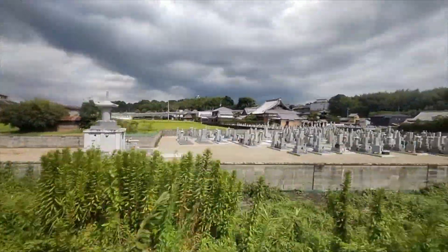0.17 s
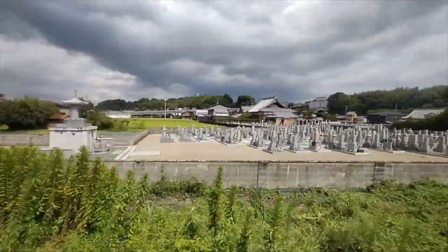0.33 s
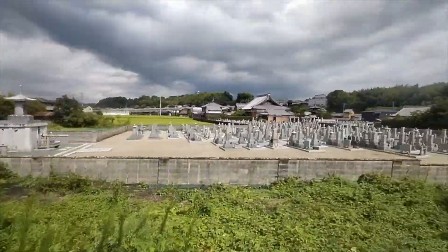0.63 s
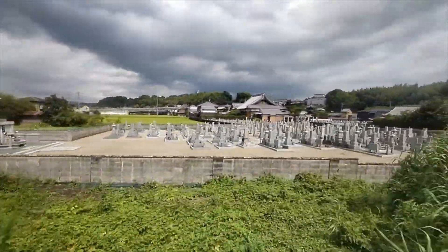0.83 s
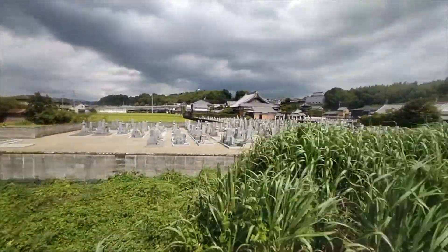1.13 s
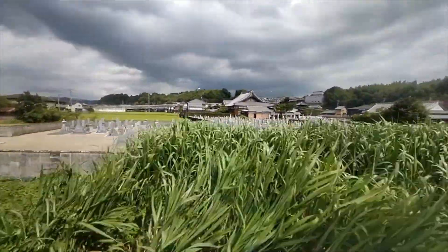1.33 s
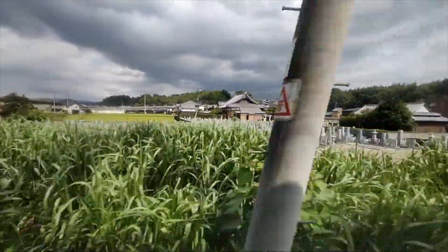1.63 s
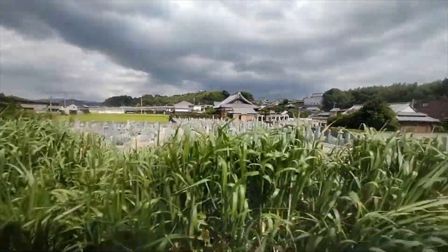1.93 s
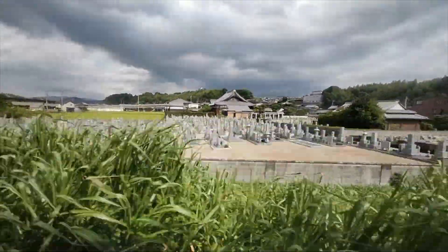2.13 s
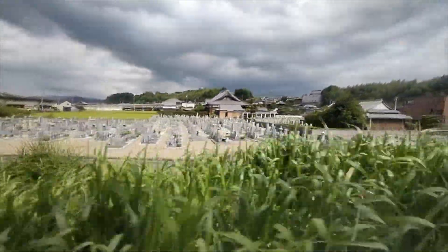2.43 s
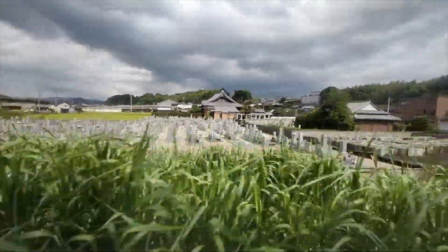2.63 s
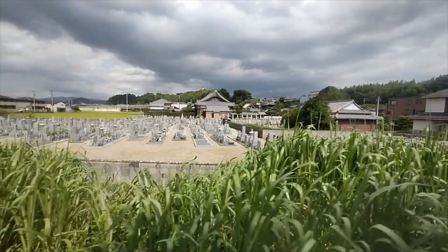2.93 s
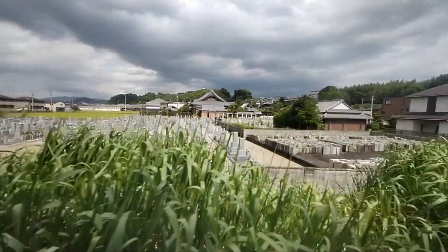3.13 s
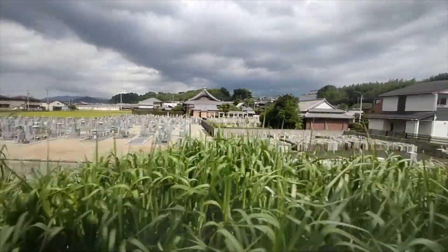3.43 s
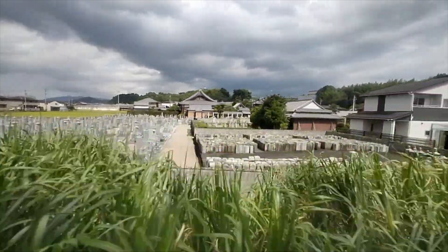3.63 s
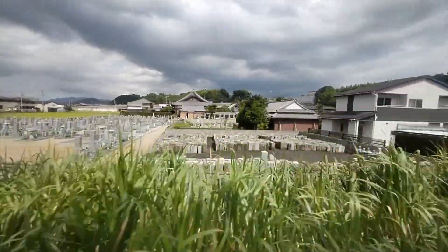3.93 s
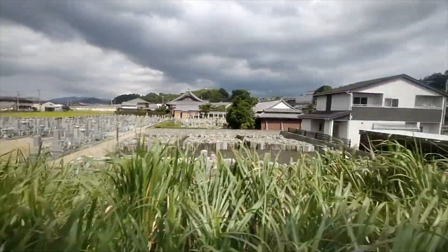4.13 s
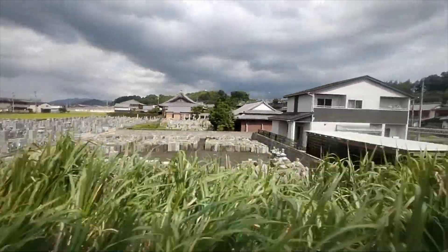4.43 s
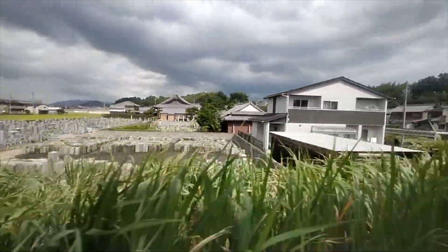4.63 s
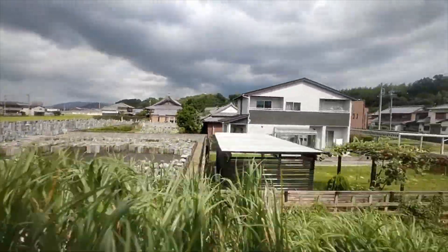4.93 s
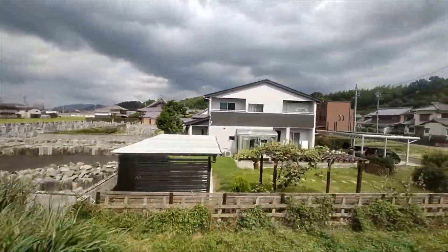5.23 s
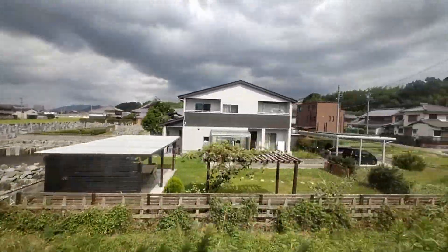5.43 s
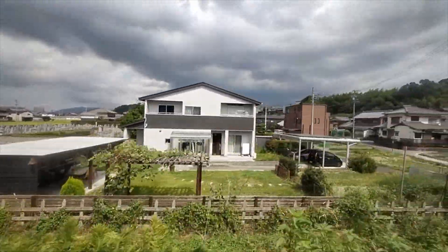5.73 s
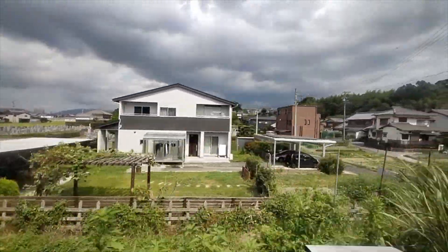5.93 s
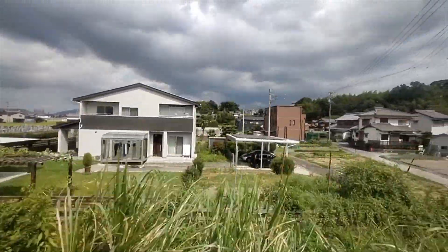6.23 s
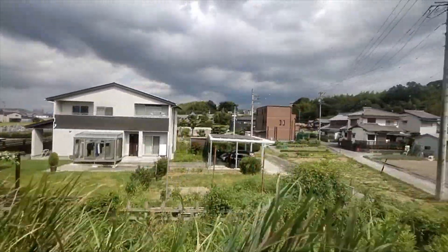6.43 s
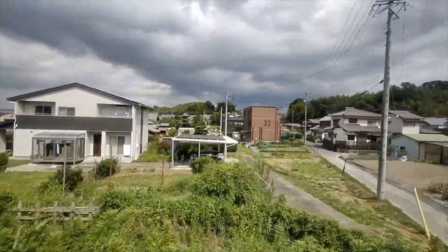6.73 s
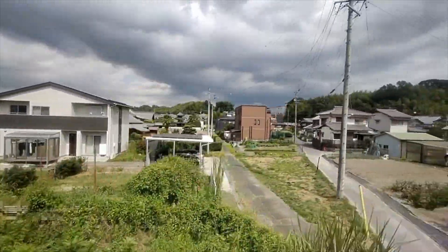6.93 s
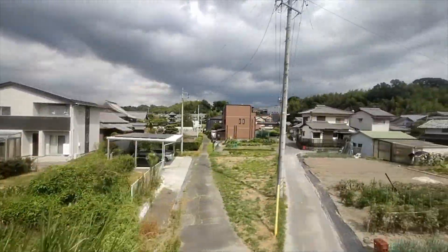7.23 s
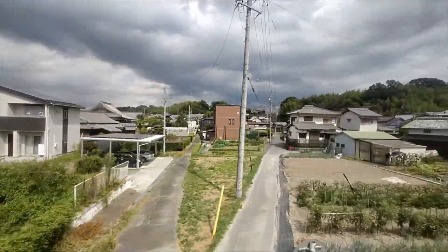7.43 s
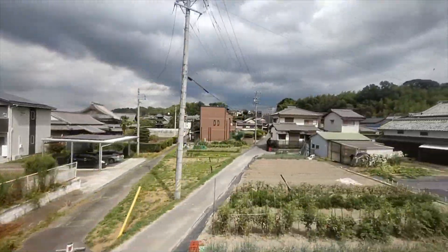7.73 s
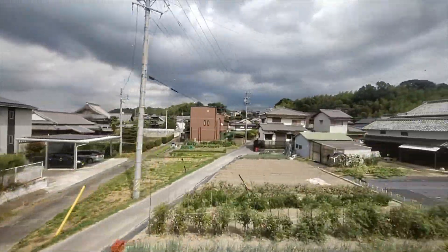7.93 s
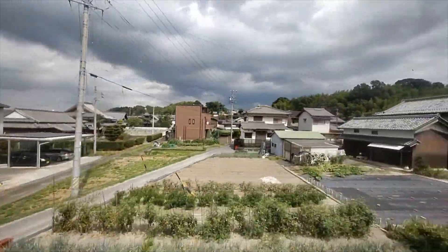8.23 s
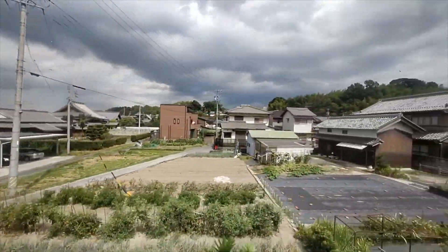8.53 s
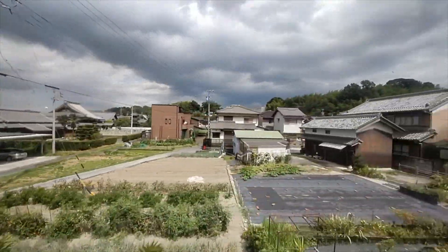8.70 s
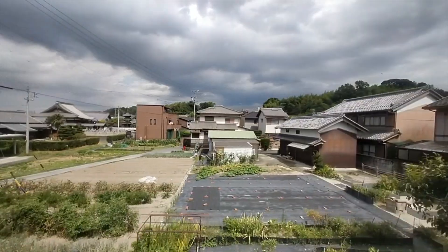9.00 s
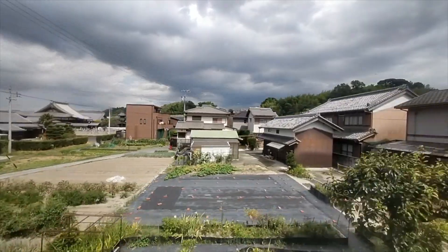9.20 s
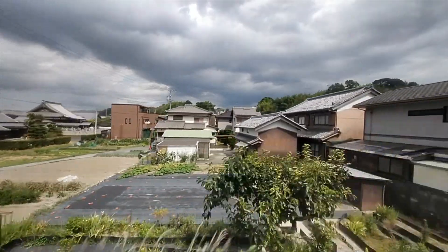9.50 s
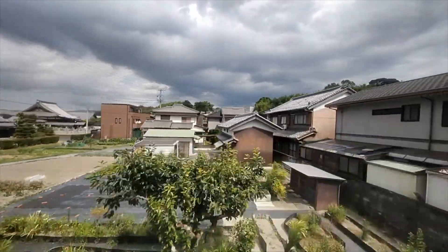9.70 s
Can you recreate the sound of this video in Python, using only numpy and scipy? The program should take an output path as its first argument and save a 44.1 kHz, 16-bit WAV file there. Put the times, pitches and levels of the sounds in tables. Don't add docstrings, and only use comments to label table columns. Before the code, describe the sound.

Train carriage interior on worn rail, steady dull rolling noise with heavy boomy knocks, clattering wheels, brief scrapes and tiny ticks of fittings.

```python
import sys
import numpy as np
from scipy import signal
from scipy.fft import rfft, irfft, next_fast_len
from scipy.io import wavfile
from scipy.ndimage import uniform_filter1d

SR = 44100
rng = np.random.default_rng(int(sys.argv[2]) if len(sys.argv) > 2 else 0)


def gain_from_db(level_db):
    decades = np.asarray(level_db, float) / 20
    return 10 ** decades


def int16_out(signal):
    q = np.round(np.clip(np.atleast_2d(signal).T, -1, 1) * 32767)
    wavfile.write(sys.argv[1], SR, q.astype(np.int16))


N = 434826

PORT_LAG_S = 0.00014
# start_s, level_db
DRONE = [(0.0, -49), (0.22, -25.5), (0.7, -42), (1.2, -28), (2.2, -28), (3.0, -25), (3.6, -25.5),
         (3.84, -22), (4.01, -26), (5.6, -29.5), (7.1, -31.5), (7.25, -40.5), (7.35, -29.5), (7.69, -50),
         (8.02, -39), (8.57, -29.5), (8.9, -45.5), (9.67, -29), (9.86, -27)]
# start_s, peak_db, boom_share_db, hardness_db
THUMPS = [(0.0, -23.5, -4, -17), (0.262, -20, -5, -17), (0.502, -8, -5, -8.5), (0.797, -11.5, -2.5, -16.5),
          (1.055, -16, -11, -13.5), (1.228, -12, -8.5, -27), (1.488, -18.5, 0, -5.5),
          (1.553, -24.5, -4, -17.5), (1.669, -12.5, -7, -12), (1.917, -11, -12, -58),
          (2.21, -11, -2.5, -15.5), (2.356, -13.5, -5.5, -6), (2.56, -16.5, -11.5, -33),
          (2.656, -17.5, -18, -49), (3.153, -15.5, -0.5, -19), (3.26, -23, -4.5, -9),
          (3.48, -8.5, -8.5, -18.5), (3.899, -15.5, -19, -16), (4.089, -8.5, -13.5, -44),
          (5.197, -9.5, -9, -21.5), (5.902, -15, -6, -20), (6.19, -18.5, -2, -16), (6.267, -20, -4.5, -24),
          (6.4, -10, -7.5, -38), (7.495, -9.5, -21, -43), (7.734, -12.5, -11, -40), (8.048, -27, -6.5, -13),
          (8.27, -26.5, -6.5, -5.5), (8.663, -11.5, -13.5, -16), (8.924, -11.5, -8.5, -10.5),
          (9.119, -19.5, -12, -28.5), (9.202, -9, -9, -19), (9.409, -12, -11.5, -17)]
# start_s, peak_db, middle_ring_db, bright_ring_db, loudest_bright_ring_hz
JOINTS = [(0.057, -32.5, -5, -10, 2220), (0.388, -29.5, -6, 0, 2100), (0.503, -19, -6, -33, 1720),
          (0.618, -24.5, -20, -22, 1720), (0.881, -29, -10, -21, 1890), (0.997, -32, -18, -20, 2220),
          (1.226, -27.5, -3, -23, 1720), (1.277, -34.5, -11, -30, 1720), (1.73, -34.5, -20, -12, 2220),
          (2.252, -27, -13, -3.5, 2220), (2.419, -30.5, -15, -0.5, 2000), (3.195, -28, -7, -19, 1890),
          (3.394, -32.5, -18, -6, 2300), (3.617, -29.5, -18, -24, 2220), (4.133, -22.5, -10, -5.5, 1890),
          (4.274, -33.5, -15, -15, 2220), (4.304, -22.5, -14, -10, 2000), (4.344, -33.5, -19, -18, 2220),
          (4.633, -29.5, -13, -24, 2220), (5.352, -27.5, -14, -22, 2220), (6.069, -20.5, -9, -6.5, 2050),
          (6.242, -22, -10, -11, 2220), (6.545, -31.5, -14, -12, 2000), (6.575, -38.5, -10, 1, 2220),
          (7.096, -42, -10, 6.5, 2200), (7.133, -36.5, -13, -3, 2220), (7.269, -33, -13, -1, 2100),
          (8.048, -28.5, 5, 1, 2290), (8.224, -31.5, 2.5, -0.5, 2250), (8.926, -30.5, -6, -15, 1720),
          (9.005, -24.5, -7, -6.5, 2300), (9.198, -32.5, -1, -1.5, 2300), (9.521, -34, -8, -8, 2220),
          (9.738, -36, -6, 2, 3200)]
# pitch_hz, level_db, t60_s, share_column of JOINTS (1 = peak alone)
WHEEL = [(820, -6, .05, 1), (953, 0, .07, 1), (1110, -3, .05, 1), (1350, 0, .075, 2), (1720, -5, .05, 3),
         (1890, 0, .07, 3), (1970, -3, .05, 3), (2220, -1, .06, 3), (2295, -2, .05, 3), (2370, -2, .05, 3),
         (2630, -8, .04, 3), (2970, -5, .05, 3), (3220, -8, .03, 3)]


def curve(table):
    s, *columns = np.transpose(table)
    return [np.interp(np.arange(N) / SR, s, column) for column in columns]


def over_hz(hz, table):
    table_hz, value = np.transpose(table)
    return np.interp(np.log(hz + 1), np.log(table_hz + 1), value)


def walk(rate_hz):
    hold = int(SR / rate_hz)
    steps = np.repeat(rng.standard_normal(N // hold + 1), hold)
    return 1.424 * uniform_filter1d(uniform_filter1d(steps, hold), hold)[:N]


def ring(blows, hz, t60_s):
    pole = np.exp(2j * np.pi * hz / SR - np.log(1000) / (t60_s * SR))
    y = signal.lfilter([1], [1, -pole], blows)
    return y.imag / np.abs(y).max(axis=-1, keepdims=True)


def sieve(x, order, hz, kind):
    return signal.sosfilt(signal.butter(order, hz, kind, fs=SR, output="sos"), x)


def place(times_s, rows):
    out = np.zeros(N + rows.shape[1])
    for s, row in zip(times_s, rows):
        start = int(s * SR)
        out[start:start + len(row)] += row
    return out[:N]


def ports(x, lag_s, lean_db):
    size = next_fast_len(N)
    delay = np.exp(-2j * np.pi * np.fft.rfftfreq(size, 1 / SR) * lag_s)
    late = irfft(rfft(x, size) * delay, size)[:N]
    return np.array([late * gain_from_db(lean_db / 2), x * gain_from_db(-lean_db / 2)])


def rolling_pair(hz, size):
    # pitch_hz, density_db per Hz
    colour = [(12, -33), (22, 1), (48, -5.5), (70, 0.5), (246, -13), (317, -16), (520, -16.5), (889, -22.5),
              (1210, -28.5), (2300, -38), (3790, -48), (5300, -48), (7010, -60), (10100, -68),
              (15700, -65.5)]
    # pitch_hz, likeness (0-1)
    likeness = [(60, 0.94), (130, 0.93), (200, 0.9), (290, 0.72), (640, 0.04), (1410, 0.03), (3100, -0.13),
                (6820, 0.02), (11000, 0.07)]
    # pitch_hz, left_minus_right_db
    lean_table = [(60, -0.5), (110, 1), (200, -1), (380, 1), (700, 0.0), (1290, 0.0), (2380, 2.5),
                  (4400, 2.5), (8120, -0.5), (15000, 2)]
    singing, singing_half_hz = .55, 35.
    port_hz, port_half_hz, port_gain = 5450, 420, 1
    direct, left, right = rfft(rng.standard_normal((3, size)))
    alike = np.clip(over_hz(hz, likeness), 0, 1) ** .5
    direct, own = np.sqrt(alike) * direct, np.sqrt(1 - alike)
    lean = gain_from_db(over_hz(hz, lean_table) / 2)
    lag = np.exp(-2j * np.pi * hz * PORT_LAG_S * (hz < 7000))
    left = lean * (direct * lag + own * left)
    right = (direct + own * right) / lean
    pair = np.array([left, right]) * gain_from_db(over_hz(hz, colour))
    pair = pair * (1 + sum(singing / (1 + ((hz - f) / singing_half_hz) ** 2) for f, *_ in WHEEL[1:]))
    return pair * (1 + port_gain / (1 + ((hz - port_hz) / port_half_hz) ** 2))


def rolling():
    # five of pitch_hz, then steady phone hiss
    zone_hz = (40, 90, 700, 2000, 5300, 10000)
    # start_s, roughness_db, sway_db
    track = [(0.0, -33.5, 3.5), (0.71, -31, -2.5), (0.85, -35.5, 2.5), (1.23, -38.5, 2),
             (1.59, -28.5, -2.5), (1.81, -36.5, 1.5), (2.17, -37, 1), (2.44, -31, 1.5), (2.75, -35, -2),
             (4.2, -33, 1), (4.45, -36.5, -1), (6.04, -36.5, -3), (6.18, -37, -1), (6.92, -36, -1.5),
             (8.32, -35, -1.5), (8.84, -37.5, -1), (9.14, -35.5, 0), (9.86, -36.5, 0)]
    # pitch_hz, share (0-1)
    jolt_reach = [(130, 0.15), (300, 0.77), (600, 1), (2500, 0.7), (5300, 0.5), (11000, 0.6)]
    flicker_db, shared_db, level_db = 1.4, .8, -23.5
    per_cause = np.array([
        (.1, 0.95, 0.9, 0.7, 0.58),
        (0.89, 1.1, .2, -.2, .3),
        (.1, 1, 0.28, 0.13, .05),
        (.1, 1, 0.98, 0.32, .05),
        (.05, .05, 1, 0.9, 1.2),
        (0.15, 0.026, .01, .01, 0.045)])
    size = next_fast_len(N)
    hz = np.fft.rfftfreq(size, 1 / SR)
    pair = rolling_pair(hz, size)
    causes_db = np.array(curve(track) + [shudder()] + patches() + curve(DRONE))
    zones_db = per_cause.T @ causes_db
    zones_db = zones_db - np.median(zones_db, axis=1, keepdims=True)
    shared, jolt, out = walk(14), jolts(), 0
    for octave in np.arange(4.5, 14.1, .5):
        band = np.cos(np.pi * np.clip(np.log2(hz + 1) - octave, -.5, .5)) ** 2
        weight = [np.interp(octave, np.log2(zone_hz), row) for row in np.eye(5, 6)]
        flicker = flicker_db * min(1, 6000 / 2 ** octave) * walk(9)
        swing_db = weight @ zones_db + shared_db * shared + flicker
        reach = over_hz(2 ** octave, jolt_reach)
        out = out + gain_from_db(swing_db) * (1 + reach * jolt) * irfft(pair * band, size)[:, :N]
    return out * gain_from_db(level_db) / np.sqrt(np.mean(out ** 2))


def jolts():
    rise_s, settle_s, jolt_db, jolt_per_db = 0.0011, 0.1, 9.5, 0.8
    table, t = np.array(JOINTS), np.arange(SR // 2) / SR
    settle = (1 - np.exp(-t / rise_s)) * np.exp(-t / settle_s)
    return place(table[:, 0], gain_from_db(jolt_db + jolt_per_db * table[:, 1:2]) * settle)


def shudder():
    rise_s, fade_s, over_thump_db = 0.0083, 0.095, 16
    table, t = np.array(THUMPS), np.arange(SR) / SR
    fade = (1 - np.exp(-t / rise_s)) * np.exp(-t / fade_s)
    return 20 * np.log10(1 + place(table[:, 0], gain_from_db(table[:, 1:2] + table[:, 2:3] + over_thump_db) * fade))


def patches():
    # middle_s, swell_db, length_s, brightness (0-1)
    worn = [(0.013, 0.5, 0.09, 0), (0.729, 3, 0.34, 0.3), (1.282, 3, 0.28, 1), (2.35, 1.5, .2, 0.7),
            (3.25, 1.5, .1, .5), (3.363, 1.5, 0.32, 0.9), (4.346, 1, 0.13, 0), (4.64, 2, 0.092, 0.2),
            (4.85, 1.5, .15, 0.99), (5.04, 1, 0.11, 1), (5.394, 0.5, 0.2, 0), (6.105, 5, 0.12, .2),
            (6.607, 1.5, 0.092, 0), (7.304, 2, 0.18, 0.02), (8.27, 1, 0.1, 0.1), (8.6, 1.5, .1, .9),
            (8.801, 1.5, .16, .9), (9.072, 2.5, 0.13, 0.5), (9.724, 2.5, 0.098, .2)]
    s, db, length_s, bright = np.transpose(worn)[:, :, None]
    hop = 64
    swell_db = db * np.exp(-(2 * (np.arange(0, N, hop) / SR - s) / length_s) ** 4)
    return [np.repeat((share * swell_db).sum(axis=0), hop)[:N] for share in (1 - bright, bright)]


def thumps():
    # pitch_hz, level_db, t60_s, group (1 core, 2 boom, 3 middle, 4 upper)
    panel = [(71, -6, .15, 2), (92, 6, .2, 2), (140, -4, .12, 2), (209, -8, .1, 1), (230, 0, .11, 1),
             (260, 3, .14, 3), (292, 5, .14, 3), (362.9, 2, .16, 4), (389, 4, .16, 4)]
    # after_first_s, level_db
    bounces = [(0, -5), (.0043, -0.5), (.0086, -3.5), (.0172, 0.5), (.0215, 0.5), (.0258, -1.5), (.041, -5),
               (.058, -8), (.084, -11.5), (.0885, -10.5)]
    shake_s, shake_db = .06, -21.5
    first_s, blow_s, jitter_s, jitter_db = 0.00399, 0.00049, 0.00056, 2
    middle_db, middle_per_hardness = -4, 0.34
    t = np.arange(SR // 3) / SR
    s, peak_db, boom_db, hard_db = np.transpose(THUMPS)[:, :, None]
    chance = rng.standard_normal((len(s), len(t) + 2 * len(bounces)))
    shake = np.sin(np.pi * np.clip(.15 + 0.97 * t / shake_s, 0, 1))
    blows = gain_from_db(shake_db) * chance[:, :len(t)] * shake
    for i, (late_s, db) in enumerate(bounces):
        when_s = first_s + late_s + jitter_s * chance[:, [-1 - 2 * i]]
        bounce_db = db + jitter_db * chance[:, [-2 - 2 * i]]
        blows = blows + gain_from_db(bounce_db) * np.exp(-((t - when_s) / blow_s) ** 2)
    soft = sieve(blows, 2, [75, 450], "bandpass")
    share_db = {1: 0, 2: boom_db, 3: middle_db + middle_per_hardness * hard_db, 4: hard_db}
    rows = sum(gain_from_db(db + share_db[group]) * ring(soft, hz, t60_s) for hz, db, t60_s, group in panel)
    return place(np.maximum(s[:, 0] - .006, 0), rows * gain_from_db(peak_db))


def joints():
    chatter_s, rattle_s, rattle_db = 0.013, .045, -1.5
    bright_fall_db = 8
    table, t = np.array(JOINTS), np.arange(SR // 4) / SR
    chance = rng.standard_normal((len(table), len(WHEEL) + 2 * len(t)))
    chatter = np.exp(-t / chatter_s) + .8 * np.exp(-t / .003)
    blows = chance[:, :len(t)] * chatter * (1 - np.exp(-t / 0.0015))
    share_db = np.where(np.arange(4) == 1, 0, table[:, :4])
    rows = 0
    for i, (hz, db, t60_s, column) in enumerate(WHEEL):
        mode_db = db + share_db[:, [column]] + 2 * chance[:, [-1 - i]]
        if column == 3:
            mode_db = mode_db - bright_fall_db * np.abs(np.log2(hz / table[:, 4:]))
        rows = rows + gain_from_db(mode_db) * ring(blows, hz, t60_s)
    rattle = chance[:, len(t):2 * len(t)] * (1 - np.exp(-t / .003)) * np.exp(-t / rattle_s)
    rows = rows + gain_from_db(rattle_db) * sieve(rattle, 1, [500, 2000], "bandpass")
    rows = sieve(rows, 2, 4000, "lowpass")
    return place(table[:, 0] - .001, rows * gain_from_db(table[:, 1:2] - 3))


def scrapes():
    # start_s, level_db, centre_hz, width_hz, fall_s
    bursts = [(0.0, -66, 11000, 6000, .03), (.55, -42, 1500, 600, .04), (.62, -42.5, 1100, 1300, .023),
              (.68, -40, 1100, 1200, .04), (.802, -34, 800, 700, .026), (1.464, -35, 1680, 450, .055),
              (1.466, -30, 650, 900, .05), (1.48, -61, 5240, 2500, .12), (1.488, -33, 870, 200, .015),
              (1.5, -69, 12500, 6000, .08), (2.243, -54, 5500, 2500, .012), (2.673, -57, 5300, 2000, .01),
              (3.977, -32, 800, 1100, .045), (3.985, -52, 4600, 1500, .04), (4.0, -23, 540, 420, .03),
              (5.02, -55, 4800, 3000, .015), (7.55, -68, 12000, 900, .05), (7.555, -70, 15000, 1400, .04),
              (7.565, -72, 8600, 500, .02), (7.6, -73, 12000, 900, .04), (7.73, -72, 15100, 1200, .03),
              (8.22, -70, 14700, 2000, .04), (9.292, -65, 12600, 6040, .02), (9.296, -53, 5000, 3000, .013),
              (9.505, -57, 5300, 1980, .033), (9.505, -71, 13000, 4950, .036), (9.51, -52, 3100, 1200, .006),
              (9.738, -51, 3800, 2500, .008)]
    rise_per_fall = 0.21
    t, out = np.arange(SR // 2) / SR, np.zeros(N)
    for (s, db, hz, width_hz, fall_s), grit in zip(bursts, rng.standard_normal((len(bursts), len(t)))):
        low_hz = np.sqrt(hz ** 2 + width_hz ** 2 / 4) - width_hz / 2
        rub = sieve(grit, 2, [low_hz, low_hz + width_hz], "bandpass")
        swell = (1 - np.exp(-(t / (rise_per_fall * fall_s)) ** 2)) * np.exp(-t / fall_s)
        out += place([s], gain_from_db(db + 7.0) * rub[None] / rub.std() * swell)
    return out


def drone():
    db, = curve(DRONE)
    level = np.sqrt(2) * gain_from_db(db + .6 * walk(3))
    pitch_hz = 49.1 + .2 * walk(2)
    return level * np.sin(2 * np.pi * np.cumsum(pitch_hz) / SR)


def whine():
    # pitch_hz, level_db, wobble_db
    tones = [(490, -49, 4), (5228, -70, 3), (5328, -73, 3), (5404, -72, 3), (5454, -71, 3), (5578, -74, 3),
             (5703, -74, 3)]
    out = 0
    for hz, db, wobble_db in tones:
        level = gain_from_db(db + wobble_db * walk(5))
        out = out + level * np.sin(2 * np.pi * np.cumsum(hz + 2.5 * walk(20)) / SR)
    return out


def ticks():
    # start_s, peak_db, centre_hz, left_minus_right_db
    contacts = [(1.8517, -60, 15400, 2), (2.2433, -53, 15250, 5),
                (2.5461, -43, 12600, 7) , (2.6728, -55, 13400, 3), (2.8394, -53.5, 13640, 4.5),
                (2.9951, -54, 14670, 2), (4.8094, -55.5, 12300, 1), (5.02, -54, 11600, 1),
                (6.2377, -60, 15100, -0.5), (7.5682, -45.5, 15600, 15), (7.5744, -51, 12200, 6.5),
                (7.5844, -58, 11700, 6), (7.7243, -57, 15300, -3), (7.7448, -55.5, 15040, 5.5),
                (8.2242, -46, 15100, 7), (8.2666, -46.5, 14850, 7.5), (8.3075, -53, 15350, 4.5),
                (8.3494, -65.5, 14700, 8.5), (8.4148, -53.5, 15650, 11)]
    t60_s, ring_t60_s, broad_db, ring_db = .04, 0.0031, -19, -2.0
    t, out = np.arange(SR // 8) / SR, np.zeros((2, N))
    fade = np.exp(-t * np.log(1000) / t60_s) * (1 - np.exp(-t / .0005))
    for (s, db, hz, lean_db), grit in zip(contacts, rng.standard_normal((len(contacts), len(t)))):
        click = sieve(grit * fade, 2, 5000, "highpass")
        sound = gain_from_db(broad_db) * click + gain_from_db(ring_db) * ring(click, hz, ring_t60_s)
        sides = gain_from_db(np.array([[lean_db], [-lean_db]]) / 2)
        out += place([s], sound[None] * gain_from_db(db)) * sides
    return out


def cabin(x, t60_s=.2, wet_db=-7):
    t = np.arange(SR // 3) / SR
    tail = rng.standard_normal((2, len(t))) * np.exp(-t * np.log(1000) / t60_s)
    tail = tail / np.sqrt(np.sum(tail ** 2, axis=1, keepdims=True))
    return gain_from_db(wet_db) * signal.fftconvolve(x[None], tail, axes=1)[:, :N]


def scene():
    clacks, knocks = joints() + scrapes(), thumps()
    near = ports(knocks, .0001, .5) + ports(clacks + whine(), PORT_LAG_S, 0.89)
    walls = cabin(clacks) + cabin(sieve(knocks, 2, 260, "highpass"), 0.15, -8.0)
    return rolling() + drone() + near + walls + ticks()


def roll_off(x):
    return signal.sosfilt(signal.butter(12, 15770, fs=SR, output="sos"), x)


def record(dry):
    top_db, squeeze, hold_s = -17, 0.35, 0.0091
    hold = int(hold_s * SR)
    power = uniform_filter1d(uniform_filter1d(np.mean(dry ** 2, axis=0), hold), hold)
    gain = np.minimum(1, gain_from_db(top_db) / np.sqrt(power + 1e-12)) ** squeeze
    rounded = np.tanh(1.213 * dry * gain) / 1.194
    top = signal.ellip(8, .2, 60, 15850, fs=SR, output="sos")
    return roll_off(signal.sosfilt(top, rounded))


dry = scene()
out = record(dry)
int16_out(out)
```